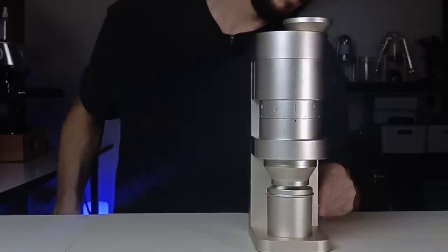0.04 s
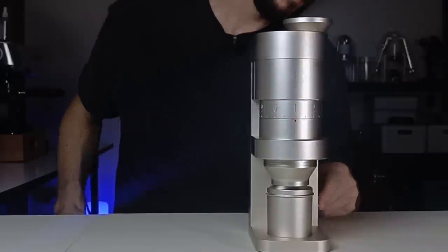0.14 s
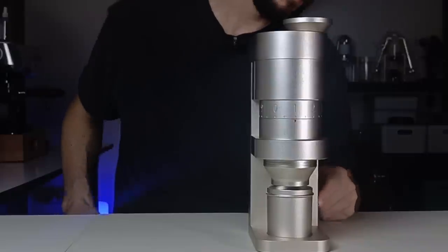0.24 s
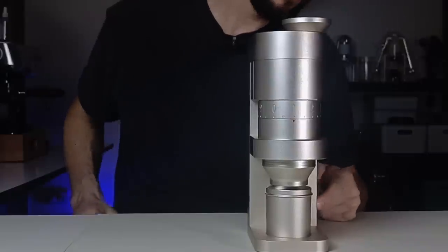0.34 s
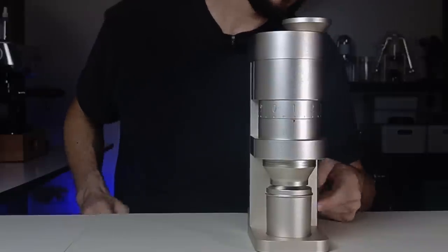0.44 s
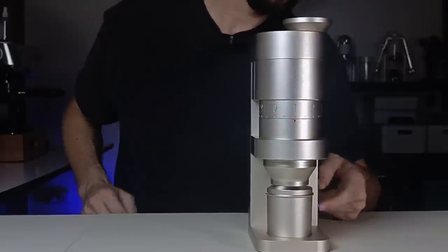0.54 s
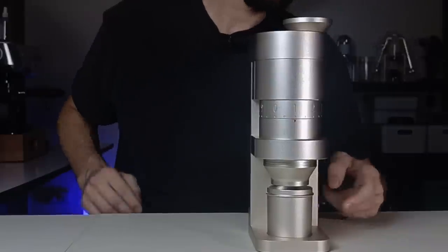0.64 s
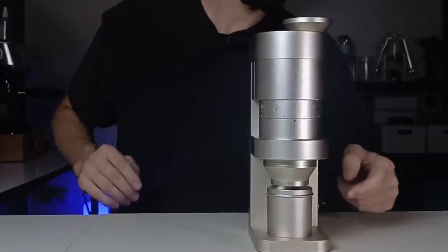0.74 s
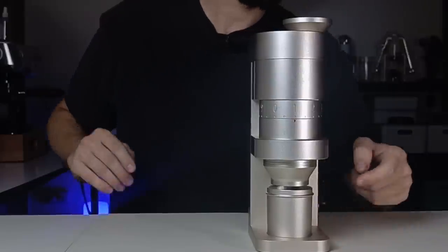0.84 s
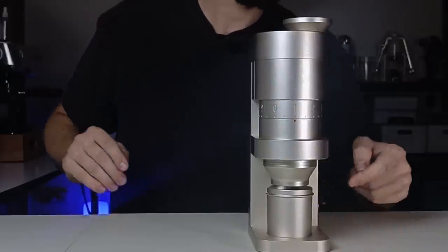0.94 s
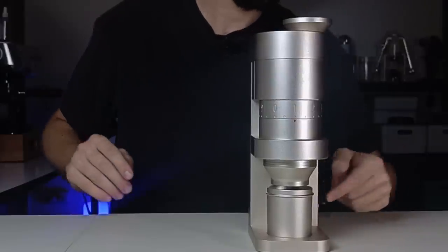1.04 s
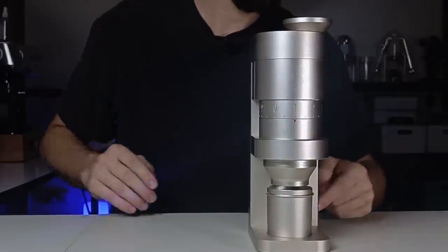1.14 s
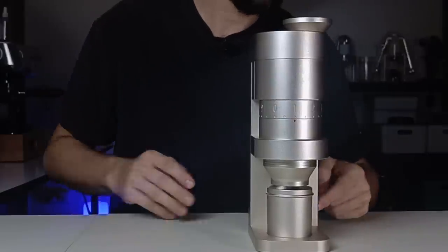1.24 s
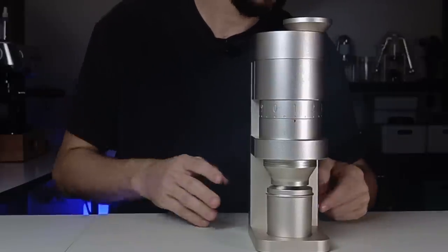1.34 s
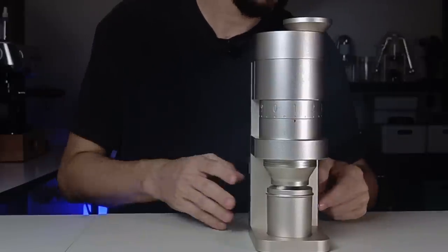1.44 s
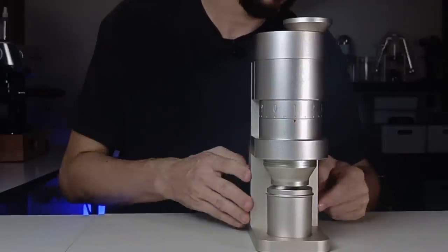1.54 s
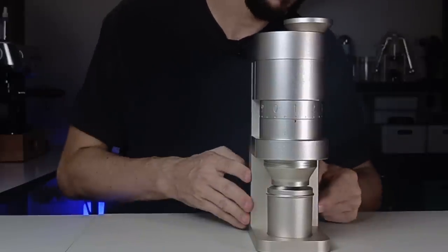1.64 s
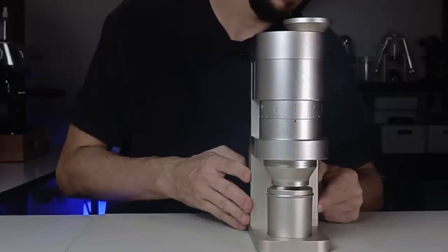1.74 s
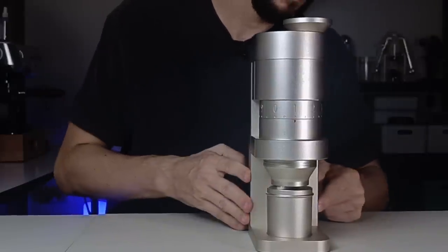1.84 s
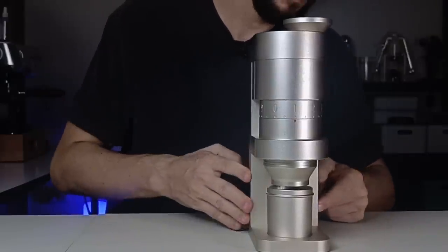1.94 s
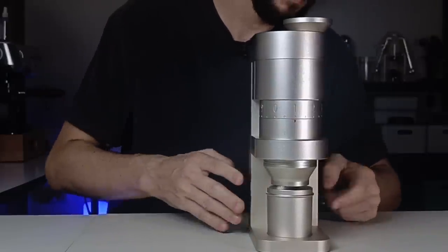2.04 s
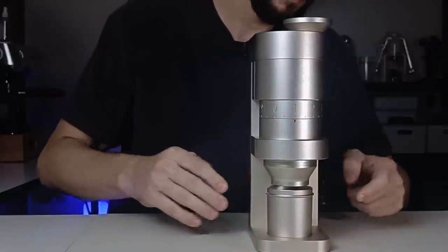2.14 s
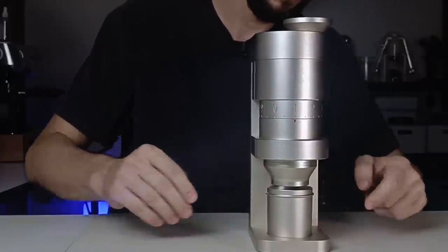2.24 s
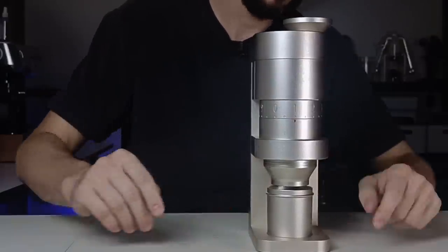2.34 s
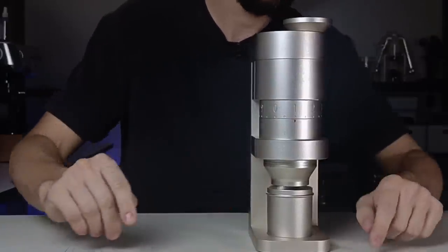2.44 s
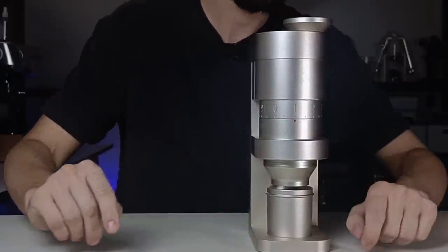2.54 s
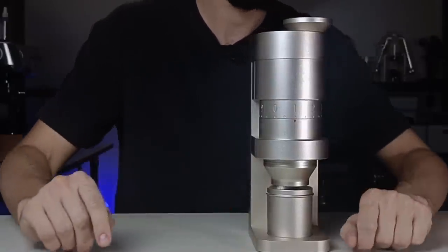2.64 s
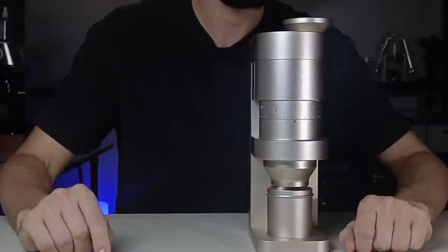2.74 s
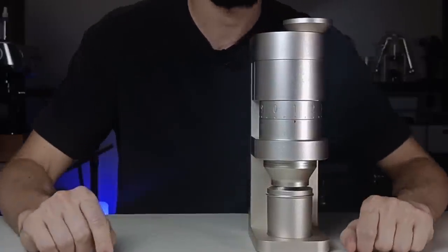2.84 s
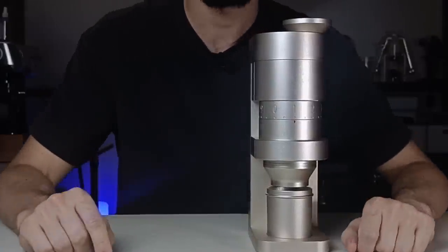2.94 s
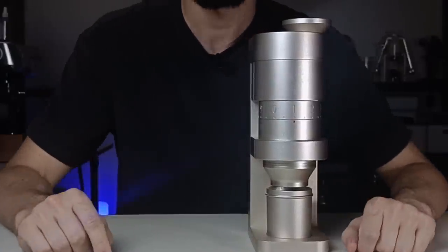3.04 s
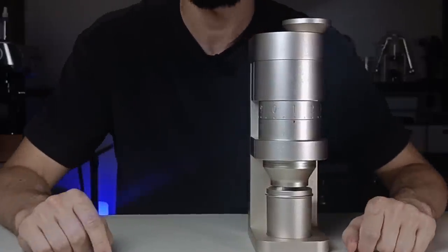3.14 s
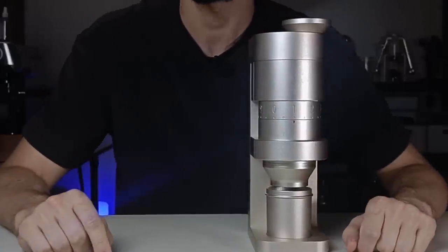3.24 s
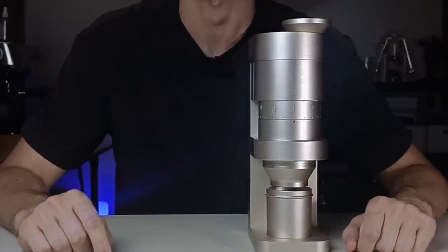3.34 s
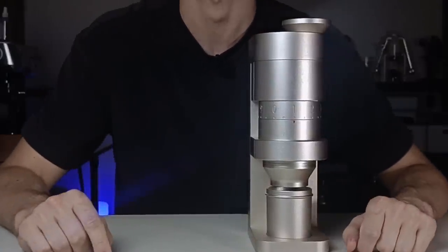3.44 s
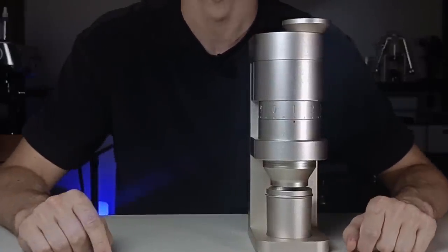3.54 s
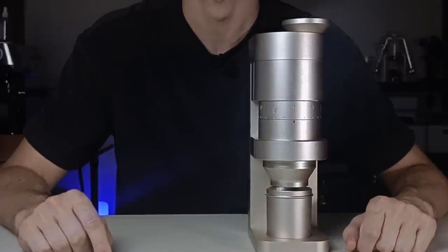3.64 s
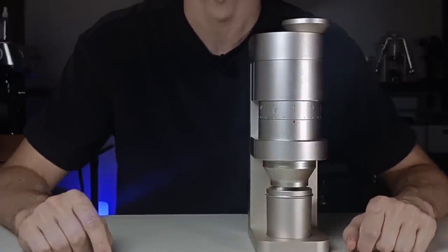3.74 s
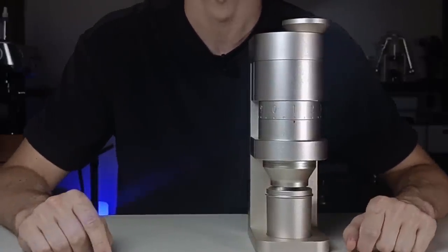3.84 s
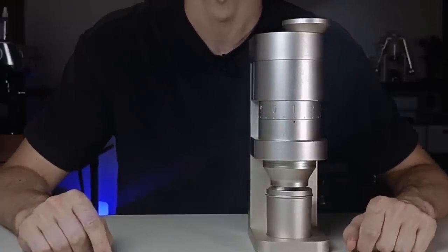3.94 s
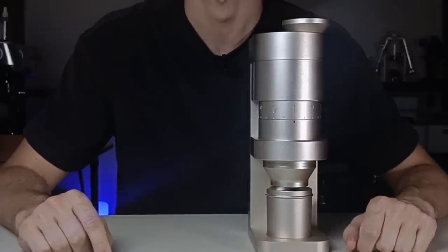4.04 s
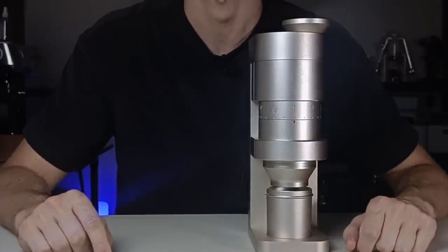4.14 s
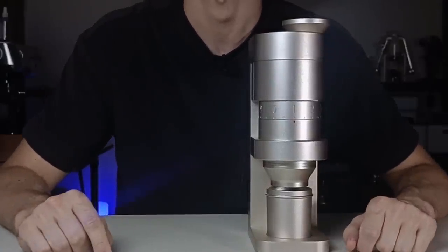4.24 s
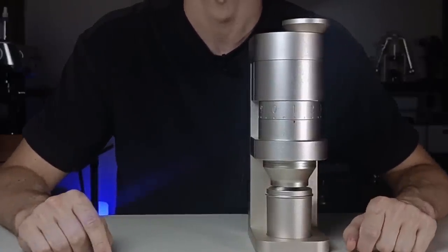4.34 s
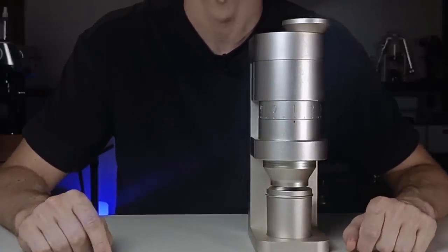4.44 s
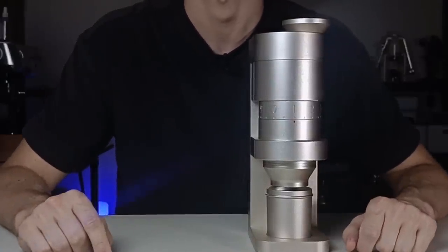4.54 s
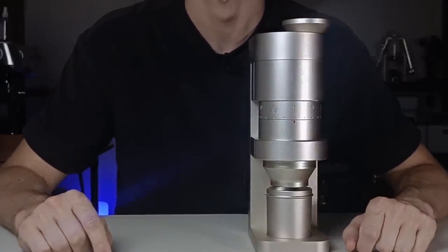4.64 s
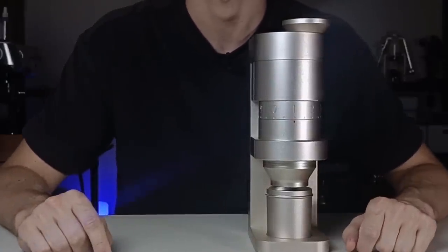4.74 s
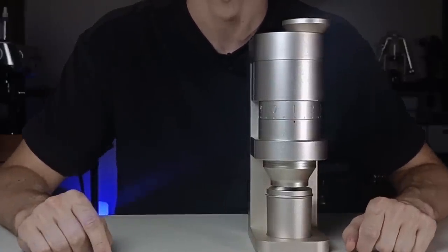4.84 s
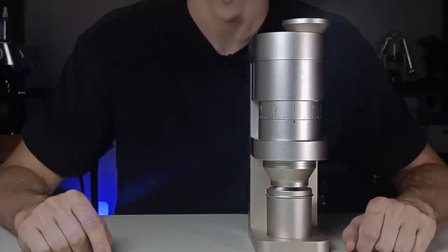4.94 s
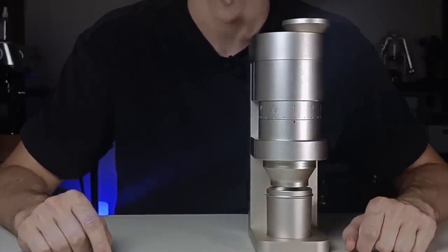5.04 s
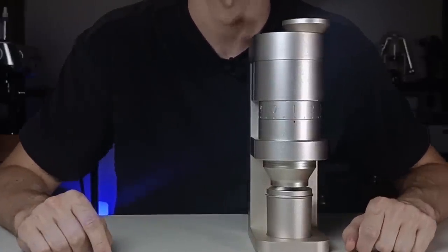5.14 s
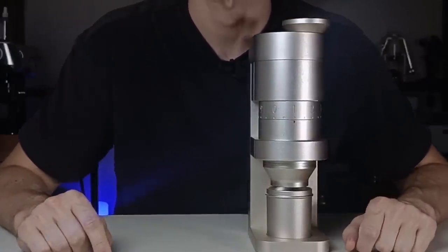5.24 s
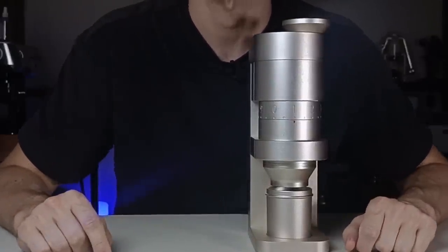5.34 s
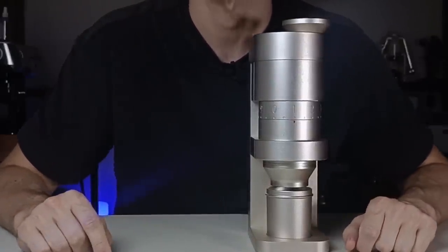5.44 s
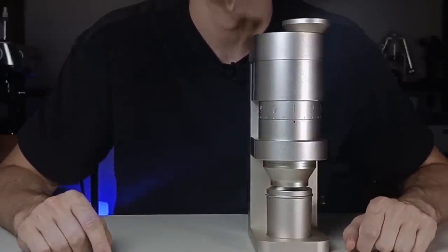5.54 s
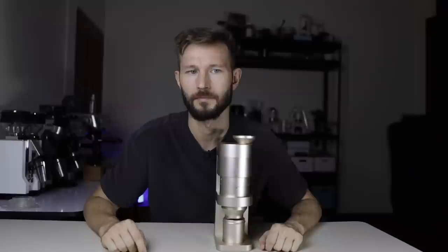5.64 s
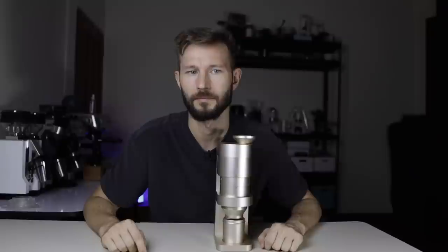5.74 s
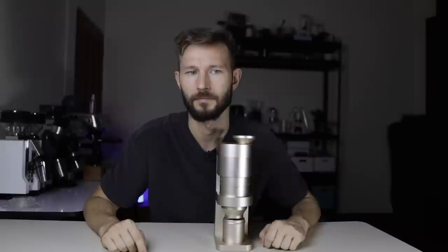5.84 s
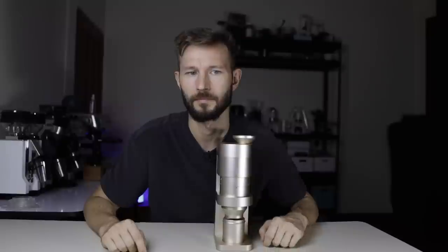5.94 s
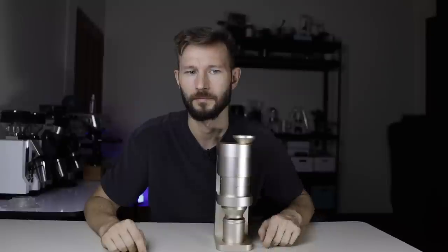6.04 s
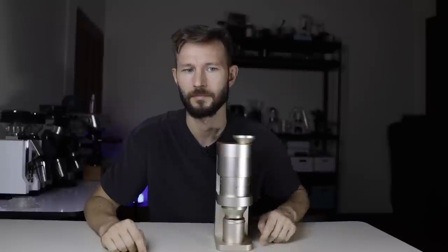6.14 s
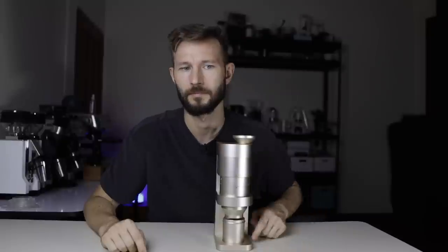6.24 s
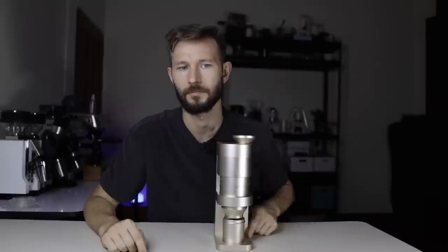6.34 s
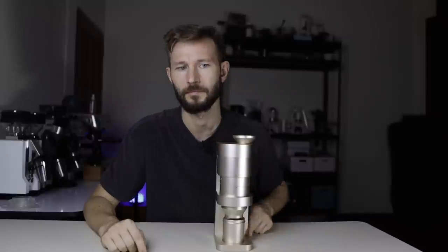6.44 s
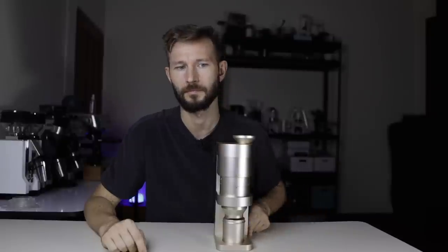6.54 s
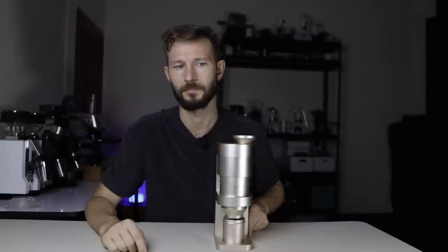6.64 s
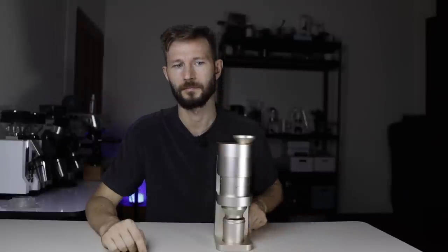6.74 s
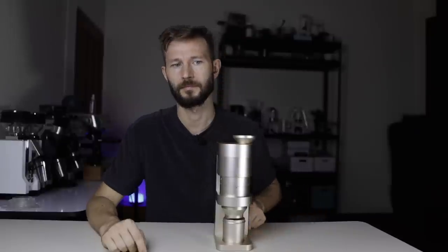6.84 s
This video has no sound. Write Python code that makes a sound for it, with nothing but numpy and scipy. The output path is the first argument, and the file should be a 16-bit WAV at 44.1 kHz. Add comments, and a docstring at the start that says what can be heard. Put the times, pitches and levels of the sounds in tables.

```python
"""An electric coffee grinder crushes one dose of beans between its burrs, two toothed steel discs.
It stands on a table in a quiet room. The motor starts, coasts almost to a stop and is switched on again.
The gears whine, the beans crack and their fragments thin out; the last pieces knock about, and the empty
burrs whirr on in the steel housing. Grinding is made of many tiny clicks, filtered so that they ring."""
import sys
import numpy as np
from scipy import signal
from scipy.fft import rfft, irfft, next_fast_len
from scipy.io import wavfile

SR = 44100
rng = np.random.default_rng(int(sys.argv[2]) if len(sys.argv) > 2 else 0)


def materialize(psi):
    """Save the field psi as 16-bit PCM at rate SR to the path in sys.argv[1].

    A 1-D psi becomes a single channel; in a 2-D psi each row is a channel.
    """
    bounded = np.clip(np.atleast_2d(psi).T, -1, 1)
    quanta = np.round(bounded * 32767).astype(np.int16)
    wavfile.write(sys.argv[1], SR, quanta)


N = 304217
TIME = np.arange(N) / SR
PADDED = next_fast_len(N + 8192)
FREQS = np.maximum(np.arange(PADDED // 2 + 1) * SR / PADDED, 1)

# when the motor has power: on t/s, off t/s
POWERED = [(0.392, 0.675), (1.648, 7.0)]
# broad tone of the grinding chamber: f/Hz, level/dB
CHAMBER_TONE = [(200, -76), (330, -13.5), (460, -6.5), (580, -2), (980, 2.5), (1130, -1.5), (1300, -13),
                (1800, -40)]
# pitches at which the chamber rings (its modes): f/Hz, width/Hz, level/dB
CHAMBER_MODES = [(594, 36, -3), (690, 60, -4), (834, 24, 0), (993, 54, -1)]

FULL_SPEED_HZ, MESHES_PER_TURN = 1642, 9.5  # speed is the mesh rate: how often gear teeth meet
START_S, CLEAR_S = POWERED[0][0], 5.97  # the motor first starts; the last dust leaves the burrs


def from_db(db):
    """Turn decibels into a gain."""
    return 10 ** (np.asarray(db) / 20)


def rms_one(x):
    """Scale a signal to an average strength (rms) of 1."""
    return x / np.sqrt(np.mean(x ** 2) + 1e-20)


def since(s):
    """Seconds gone by after a moment, zero before it."""
    return np.maximum(TIME - s, 0)


def in_time(rows):
    """Join (time, value) points with straight lines."""
    return np.interp(TIME, *np.transpose(rows))


def shaped(x, gain):
    """Filter by a gain per frequency; the result has rms 1."""
    return rms_one(irfft(rfft(x, PADDED) * gain)[:N])


def drift(rate):
    """A random wobble of size 1 that changes about rate times a second."""
    return shaped(rng.standard_normal(N), 1 / (1 + (FREQS / rate) ** 2))


def colour(points):
    """Gain per frequency for a broad tone that falls steeply beyond its ends."""
    hz, db = np.transpose(points)
    ends = np.minimum(1, np.minimum(FREQS / hz[0], hz[-1] / FREQS)) ** 8
    return from_db(np.interp(np.log(FREQS), np.log(hz), db)) * ends


def body(x, tone, modes, modes_db):
    """Pass a sound through an object: a broad tone with a few ringing pitches on top."""
    power = colour(tone) ** 2
    for hz, width, db in modes:
        power = power + from_db(db + modes_db) ** 2 / (1 + ((FREQS - hz) / (0.63 * width)) ** 2) ** 2
    return shaped(x, np.sqrt(power))


def grains(per_s, spread_db):
    """Tiny cracks and contacts: clicks of uneven size at random moments."""
    born = rng.random(N) < per_s / SR
    sizes = from_db(spread_db * np.minimum(rng.exponential(1, N), 4.5))
    return rms_one(born * sizes * rng.choice([-1, 1], N))


def strikes(times, db):
    """One click per event."""
    clicks = np.zeros(N)
    clicks[np.round(times * SR).astype(int)] = from_db(db)
    return clicks


def fading(clicks, t60):
    """Give each click a tail that falls 60 dB in t60 seconds."""
    return signal.lfilter([1], [1, -from_db(-60 / (t60 * SR))], clicks + 1e-18)


def ring(clicks, hz, t60):
    """Each click starts a pure tone that falls 60 dB in t60 seconds."""
    decay, angle = from_db(-60 / (t60 * SR)), 2 * np.pi * hz / SR
    return signal.lfilter([0, np.sin(angle)], [1, -2 * decay * np.cos(angle), decay ** 2], clicks + 1e-18)


def speed(kick_hz=238, spin_up_hz_per_s=5700, drag_s=1.33, friction_hz_per_s=775):
    """The mesh rate climbs to full speed under power; without it, drag and friction slow it."""
    mesh_hz, friction_hz = np.zeros(N), friction_hz_per_s * drag_s
    for on, off in POWERED:
        ramp = kick_hz + spin_up_hz_per_s * (since(on) - since(off))
        held = ramp / (1 + (ramp / FULL_SPEED_HZ) ** 12) ** (1 / 12)
        coasting = (held + friction_hz) * np.exp(-since(off) / drag_s) - friction_hz
        mesh_hz = np.where(TIME < on, mesh_hz, coasting)
    return np.maximum(mesh_hz, 1)


def slowed(mesh_hz, knee, power):
    """Change in dB of a sound that weakens below a share (knee) of full speed."""
    return -10 * np.log10(1 + (knee * FULL_SPEED_HZ / mesh_hz) ** power)


def room(level_db=-56.5):
    """The soft noise of a quiet room, and arms settling on the table."""
    # tones of the room and of the bumps: f/Hz, level/dB
    room_tone = [(12, -28), (20, 0.5), (44, -8.5), (98, -10), (660, -28.5), (897, -30), (3950, -47),
                 (7950, -53), (12800, -40), (16000, -38)]
    bump_tone = [(15, -13), (32, 4), (50, -20), (90, -18), (200, -50)]
    # arms bump the table: t/s, level/dB, length/s
    arm_bumps = [(1.728, -47, .04), (2.843, -38, 0.044), (6.142, -64, 0.037)]
    weight = sum(from_db(db) * np.exp(-.5 * ((TIME - s) / length) ** 2) for s, db, length in arm_bumps)
    bumps = weight * shaped(rng.standard_normal(N), colour(bump_tone))
    return bumps + from_db(level_db) * shaped(rng.standard_normal(N), colour(room_tone))


def shaking(mesh_hz, crush_db):
    """Grinding shakes the base, most when the motor turns at the base's own pitch."""
    # tone of the rumble: f/Hz, level/dB
    rumble_tone = [(25, -17), (50, -29), (75, 11), (95, 1), (125, 9), (200, 15), (280, -27)]
    rotor_hz = mesh_hz / MESHES_PER_TURN
    rotor = np.sin(2 * np.pi * np.cumsum(rotor_hz) / SR) / (1 + ((rotor_hz - 118) / 9) ** 2)
    rumble = shaped(rng.standard_normal(N), colour(rumble_tone))
    return from_db(crush_db) * (from_db(-17) * rotor + from_db(-37.5) * rumble)


def snaps():
    """The switch and splitting beans send sharp, very short snaps through the steel."""
    # the snaps: t/s, relative level/dB
    hits = [(0.391, -9.5), (0.467, -15), (0.4865, -18), (1.526, -21), (1.5844, -17), (1.648, -7)]
    # their bright tone: f/Hz, level/dB
    snap_tone = [(400, -35), (1500, -4.5), (4000, -22), (5800, -9), (7500, -25), (9700, 4), (11500, -5),
                 (14000, 1), (16000, 4)]
    clicks = strikes(*np.transpose(hits))
    envelope = from_db(-6) * (fading(clicks, t60=.018) + from_db(-24) * fading(clicks, t60=.12))
    return envelope * shaped(rng.standard_normal(N), colour(snap_tone))


def knocks():
    """The button or a caught bean thuds in the chamber; a crumbling bean also rocks the base."""
    # the knocks: t/s, relative thud level/dB, relative boom level/dB
    hits = [(0.381, -33, -90), (0.439, -9, -67), (0.469, -5, -72), (0.605, -6.5, -69), (4.178, -8.5, -58),
            (4.27, -12, -56.5), (4.409, -8, -56), (4.499, -23, -51.5), (4.586, -14.5, -52),
            (4.651, -18, -44.5), (4.816, -15.5, -54.5)]
    # how the table and the grinder's base ring: f/Hz, level/dB, t60/s
    base_modes = [(72, -9, .14), (135, 0, .06), (215, -1, .06), (400, -3, .03), (560, 0, .04)]
    times, thud_db, boom_db = np.transpose(hits)
    chamber = body(rng.standard_normal(N), CHAMBER_TONE, CHAMBER_MODES, modes_db=-28)
    thud = from_db(-13) * fading(strikes(times, thud_db), t60=0.063) * chamber
    crumbling = fading(strikes(times, boom_db), t60=.24) * rng.standard_normal(N)
    boom = sum((-1) ** k * from_db(db) * ring(crumbling, hz, t60)
               for k, (hz, db, t60) in enumerate(base_modes))
    return thud + signal.sosfilt(signal.butter(2, 55, "high", fs=SR, output="sos"), boom)


def motor(mesh_hz, hum_db, strained_db=-34.5, spin_up_db=2.5, build_s=0.38):
    """The gears whine as their teeth meet, rougher and brighter below full speed; the rotor hums."""
    # whine at full speed: t/s, level/dB
    whine_levels = [(1.9, -37.5), (2.11, -29), (2.54, -37.5), (2.63, -31.5), (3.17, -33.5), (3.24, -48),
                    (3.31, -28.5), (3.74, -51), (3.91, -39.5), (5.6, -61)]
    # its tones: multiple of the mesh rate, level at full speed/dB, level when slower/dB
    harmonics = [(1, 0, -2), (2, -14, -1), (3, -9, -1), (4, -30, -7), (5, -35, -9), (6, -40, -12),
                 (7, -45, -11)]
    strain = np.clip((1610 - mesh_hz) / 200, 0, 1)  # 0 at full speed, 1 well below it
    rising = np.gradient(mesh_hz) > 0
    whine_db = (1 - strain) * in_time(whine_levels) + strain * (strained_db + spin_up_db * rising)
    whine_db += slowed(mesh_hz, knee=0.46, power=7.1)
    unsteady = .0045 * drift(40) + .012 * strain * drift(110)
    phase = 2 * np.pi * np.cumsum(mesh_hz * (1 + unsteady)) / SR
    whine = 0
    for k, fast_db, slow_db in harmonics:
        harmonic_db = fast_db + (slow_db - fast_db) * strain
        housing = 1 / (1 + (k * mesh_hz / 5600) ** 5)  # muffles the highest tones
        flicker_db = (1.5 + 2 * strain) * drift(30) - .6
        whine = whine + from_db(whine_db + harmonic_db + flicker_db) * housing * np.sin(k * phase)
    settled = np.clip(since(START_S) / build_s, 0, 1) ** 2
    rotor_hz = mesh_hz / MESHES_PER_TURN * (1 + .01 * drift(8))
    hum = from_db(hum_db + 2.4 * drift(4.4)) * (1 - strain) * np.sin(2 * np.pi * np.cumsum(rotor_hz) / SR)
    return np.sqrt(2) * settled * (whine + hum)


def stray_grit(level_db=-37.5, fade_in_s=0.63):
    """The last loose crumbs rattle softly against the spinning burrs."""
    # tone of crumbs on steel: f/Hz, level/dB
    steel_tone = [(2500, -22), (4500, -13), (6000, -4), (7700, -6), (9000, 0), (10600, 6), (12000, 0)]
    fade_in = np.clip(since(CLEAR_S) / fade_in_s, 0, 1)
    return from_db(level_db) * fade_in * shaped(grains(1500, spread_db=2.8), colour(steel_tone))


def rubbing(start_s=5.25, turn_s=0.089, count=11, level_db=-28.5, spread_db=2.2, touch_s=0.023):
    """The bare burrs graze each other once a turn and chirp, with uneven force."""
    # tone of the chirp: f/Hz, level/dB
    chirp_tone = [(3400, -28), (4300, -13), (5000, -34)]
    # its ringing pitches: f/Hz, width/Hz, level/dB
    chirp_modes = [(3513, 34, -3), (3970, 90, -9), (4195, 60, -2), (4310, 100, -1), (4690, 60, -11),
                   (5080, 42, -15)]
    times = start_s + turn_s * np.arange(count)
    forces = from_db(level_db + spread_db * rng.standard_normal(count))
    contact = sum(force * np.exp(-.5 * ((TIME - s) / touch_s) ** 2) for s, force in zip(times, forces))
    return contact * body(rng.standard_normal(N), chirp_tone, chirp_modes, modes_db=6.1)


def singing(mesh_hz, fill, pitch_hz=4188, width_hz=38, fade_db_per_s=3.5):
    """Whole beans rub the upper burr and keep one high note ringing, less as they break up."""
    level_db = -35 - fade_db_per_s * since(START_S) + slowed(mesh_hz, knee=0.51, power=5)
    resonance = 1 / (1 + ((FREQS - pitch_hz) / width_hz) ** 2)
    return from_db(level_db) * np.clip(fill - 1, 0, 1) * shaped(rng.standard_normal(N), resonance)


def tumbling(mesh_hz, empty_s=4.6, loosen_s=1.3, fade_db_per_s=73):
    """Pieces tumble in the opening above the burrs, louder as they gain room, until it is empty."""
    # their dull tone: f/Hz, level/dB
    tumble_tone = [(130, -10), (200, -12.5), (270, -10), (330, 4), (450, 0.5), (620, 3)]
    loose = np.clip(1 + (TIME - empty_s) / loosen_s, 0, 1)
    level_db = -39.5 + 4.5 * loose - fade_db_per_s * since(empty_s)
    level_db += slowed(mesh_hz, knee=0.88, power=8.8)
    return from_db(level_db) * shaped(grains(350, spread_db=-1.5), colour(tumble_tone))


def sizzle(mesh_hz, fill, empty_db=-22.5, loaded_db=-21, fade_db_per_s=7.5):
    """Steel teeth chatter at very high pitches; running empty, they flutter regularly."""
    # tone of the steel with and without whole beans: f/Hz, level/dB
    full_tone = [(9000, -22), (9400, -53), (9650, -5.5), (10200, -7.5), (11200, -1.5), (12300, -10),
                 (13300, -7), (14300, -0.5), (15750, -12)]
    free_tone = [(9000, -25), (10200, -18.5), (11300, -15.5), (11700, -7), (12350, -3.5), (13300, -7),
                 (14200, -7), (14600, 1), (15750, -18)]
    # its ringing pitches in each case: f/Hz, width/Hz, level/dB
    full_modes = [(9840, 200, -10), (10520, 73, -10), (11500, 150, -3), (12070, 80, -7), (12600, 86, -6),
                  (13900, 260, -1), (14880, 160, -9)]
    free_modes = [(9850, 190, -23), (10720, 90, -15), (11558, 40, -7), (12094, 56, -5), (12599, 62, 2),
                  (12860, 220, -7), (13565, 110, -4), (13850, 280, -7), (14470, 40, -8), (14864, 130, -5),
                  (15280, 170, -11)]
    level_db = np.interp(fill, [0, 1], [empty_db, loaded_db]) - fade_db_per_s * since(CLEAR_S)
    level_db += slowed(mesh_hz, knee=0.45, power=6)
    whole, empty = np.clip(fill - 1, 0, 1), np.clip(1 - fill, 0, 1)
    full = body(grains(11000, spread_db=0.5), full_tone, full_modes, modes_db=5.5)
    free = body(grains(12000, spread_db=2.2), free_tone, free_modes, modes_db=2.5)
    flutter = 1 + 0.16 * empty * np.sin(2 * np.pi * 98.1 * TIME)
    return from_db(level_db) * flutter * (np.sqrt(whole) * full + np.sqrt(1 - whole) * free)


def scraping(mesh_hz, fill, empty_db=-26.5, loaded_db=-26, fade_db_per_s=10.5):
    """Grit is dragged over the burr faces; the emptier they are, the more freely they ring."""
    # tone with whole beans, with fragments and with nothing: f/Hz, level/dB
    full_tone = [(1200, -1.5), (1500, 1), (2700, 2.5), (3700, -5), (4300, -5.5), (4950, -4.5),
                 (6200, -16.5), (7800, -22.5), (9000, -9)]
    thin_tone = [(1200, 1), (1850, 0.5), (2400, 1.5), (3100, -4.5), (3400, 3.5), (4400, 6.5), (4850, 4),
                 (5600, -16.5), (7200, -10), (7700, -16), (9000, -9)]
    free_tone = [(1200, -12.5), (1500, -23), (2050, -43), (2650, -48), (3300, -29), (3900, -8.5), (4300, 1),
                 (4700, -12.5), (5500, -25.5), (6600, -27), (7600, -37), (8500, -12), (9000, -27)]
    # ringing pitches in each case: f/Hz, width/Hz, level/dB
    full_modes = [(2811, 70, -3), (3330, 160, -4), (4185, 70, -7), (4940, 60, -9), (5990, 50, -15),
                  (6270, 78, -19)]
    thin_modes = [(2305, 30, 5), (2811, 50, 0), (3050, 34, -1), (3330, 90, 1), (3900, 120, 0),
                  (4190, 70, 2), (6270, 60, -10), (7200, 150, -15), (8090, 50, -13)]
    free_modes = [(1667, 38, -15), (2357, 89, -12.5), (2400, 56, -11), (3080, 124, -10), (3550, 8.1, -9.5),
                  (4580, 82, 1.5), (6217, 56, -11.5), (6750, 130, -15), (7160, 110, -16.5)]
    level_db = np.interp(fill, [0, 1], [empty_db, loaded_db]) - fade_db_per_s * since(CLEAR_S)
    level_db += slowed(mesh_hz, knee=0.45, power=3.95)
    whole, empty = np.clip(fill - 1, 0, 1), np.clip(1 - fill, 0, 1)
    full = body(grains(6000, spread_db=0.5), full_tone, full_modes, modes_db=7.5)
    thin = body(grains(5000, spread_db=1.5), thin_tone, thin_modes, modes_db=5.5)
    free = body(grains(7000, spread_db=2.5), free_tone, free_modes, modes_db=1.5)
    free *= from_db(.8 * drift(12) - 2.2)
    blend = np.sqrt(whole) * full + np.sqrt(1 - whole - empty) * thin + np.sqrt(empty) * free
    return from_db(level_db) * blend


def crushing(level_db, fill):
    """Beans crack between the burrs and thud in the chamber; empty, it only rustles."""
    # tone of the empty chamber: f/Hz, level/dB
    rustle_tone = [(110, -10.5), (300, -4), (600, -3.5), (780, -1.5), (1050, 5.5), (1300, -10)]
    cracks = grains(2400, spread_db=2.5) * from_db(0.6 * drift(27))
    loaded = np.clip(fill, 0, 1)
    beans = body(cracks, CHAMBER_TONE, CHAMBER_MODES, modes_db=7.5)
    rustle = body(rng.standard_normal(N), rustle_tone, [(565, 76, -2)], modes_db=5)
    return from_db(level_db) * (np.sqrt(loaded) * beans + np.sqrt(1 - loaded) * rustle)


def scene(bite_s=0.059, first_bite_db=3, first_bite_fade_s=0.21):
    """The whole grinder heard from close by; its speed and how full it is set the levels."""
    # what lies between the burrs: t/s, fill (2 whole beans, 1 fragments, 0 nothing)
    filling = [(2.5, 2.0), (3.05, 1.03), (3.8, 1.02), (5.2, 0.52), (5.38, 0.033), (6.2, 0.054), (6.6, 0.39)]
    # load on the burrs, as loudness of crushing at full speed: t/s, level/dB
    load = [(1.85, -25.5), (2.27, -28), (2.31, -24.5), (2.37, -26), (2.43, -23), (3.44, -28.5),
            (4.42, -31.5), (5.38, -44.5), (6.9, -48)]
    mesh_hz, fill, running_s = speed(), in_time(filling), since(START_S)
    crush_db = in_time(load) + first_bite_db * np.exp(-running_s / first_bite_fade_s)
    crush_db += slowed(mesh_hz, knee=0.52, power=3.56)
    biting = from_db(-16 * np.clip(1 - running_s / bite_s, 0, 1)) * (running_s > 0)  # beans take hold
    uneven_feed = from_db(0.45 * drift(36))
    burrs = crushing(crush_db, fill) + tumbling(mesh_hz) + scraping(mesh_hz, fill) + sizzle(mesh_hz, fill)
    burrs = burrs + singing(mesh_hz, fill) + rubbing() + stray_grit()
    hum_db = np.interp(fill, [0, 1], [-46.5, -52]) - since(CLEAR_S)  # fades 1 dB a second once clear
    machine = biting * (uneven_feed * burrs + motor(mesh_hz, hum_db) + shaking(mesh_hz, crush_db))
    return (machine + snaps() + knocks() + room())[None]


def record(dry, cutoff_hz=15740):
    """Cut off the very highest treble steeply."""
    return signal.sosfilt(signal.ellip(12, .1, 80, cutoff_hz, fs=SR, output="sos"), dry)


dry = scene()
out = record(dry)
materialize(out)
```